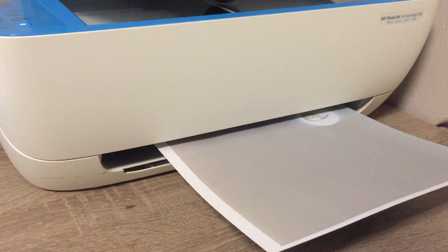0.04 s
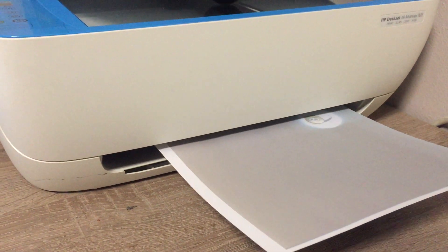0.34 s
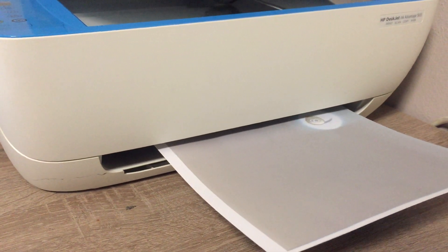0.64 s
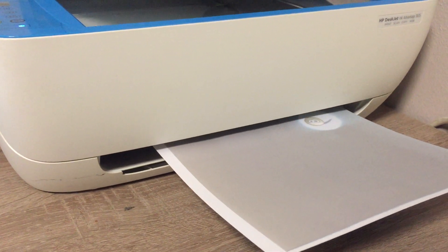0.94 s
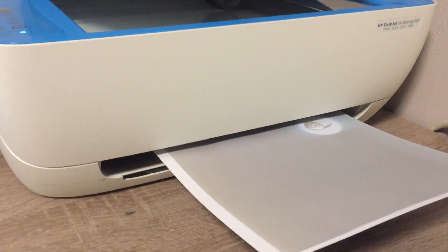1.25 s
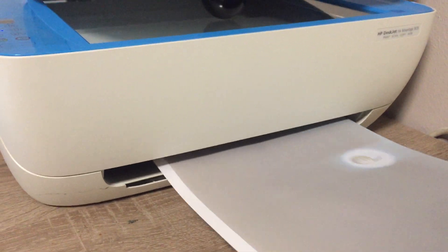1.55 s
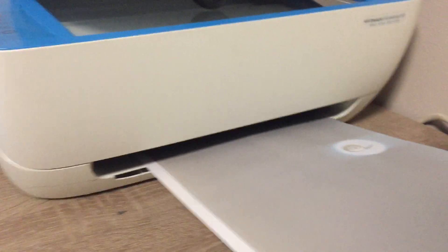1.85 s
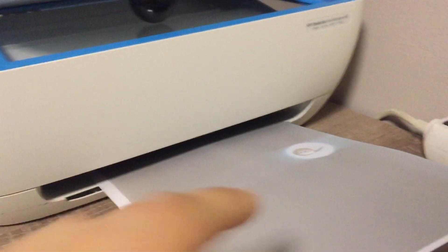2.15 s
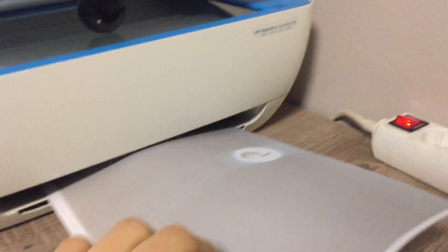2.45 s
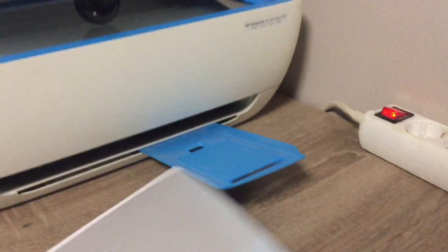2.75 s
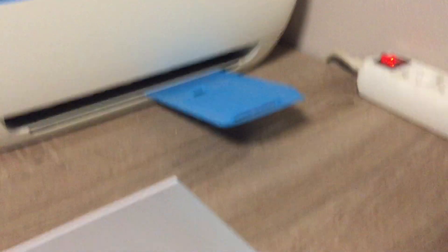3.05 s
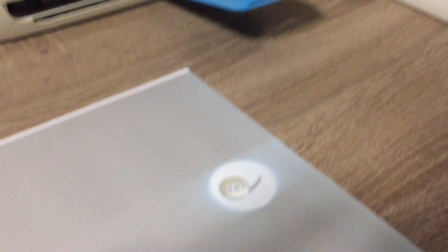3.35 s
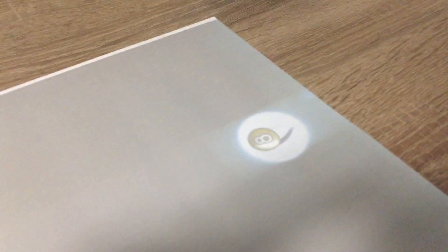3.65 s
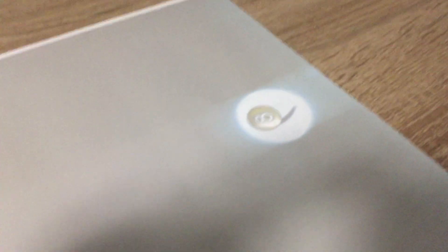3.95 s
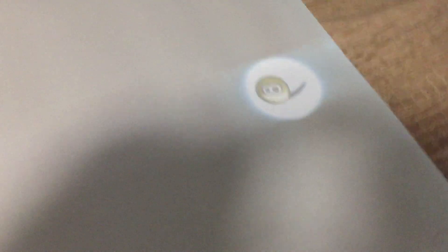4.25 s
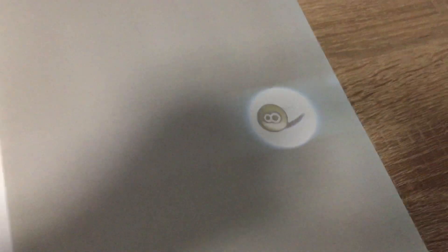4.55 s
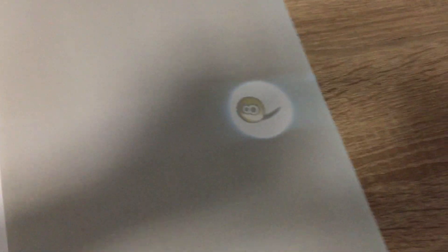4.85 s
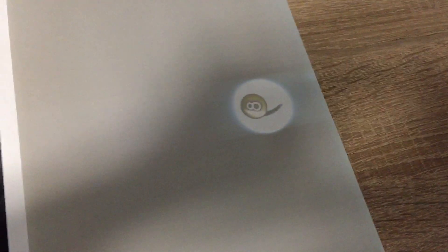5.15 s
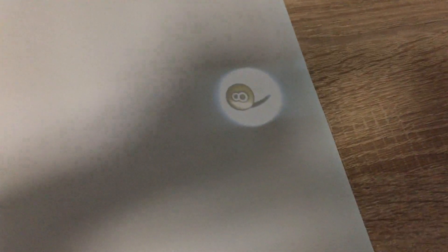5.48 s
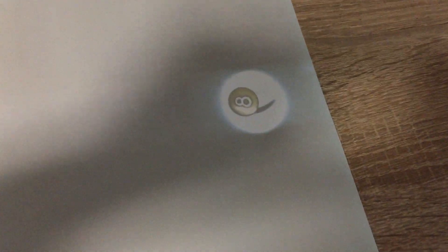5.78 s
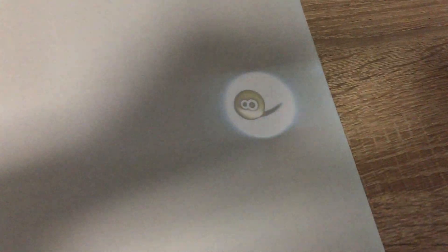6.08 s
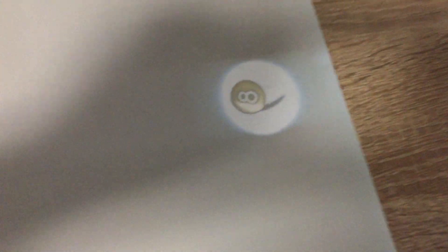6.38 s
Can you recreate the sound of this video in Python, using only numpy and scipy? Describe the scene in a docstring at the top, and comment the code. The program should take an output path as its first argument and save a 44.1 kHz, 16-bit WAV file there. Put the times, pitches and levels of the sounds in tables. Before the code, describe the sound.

Printer gears whir as the carriage shuttles and rattles home, then paper is pulled from the tray and flexes faintly over a steady hum.

```python
"""An inkjet printer on a wooden desk finishes a page over a steady mains hum. Its feed gears whir and
shake the case while the carriage makes four passes, whining up to speed and rattling to a stop.
At 1.5 s the carriage races home, belt teeth clattering, and the rollers drive the sheet out.
At 2.5 s the sheet snaps free and scrapes over the tray, ringing the air gap beneath it.
From 4.4 s it flexes a few times in the hand."""
import sys
import numpy as np
from scipy import signal
from scipy.fft import rfft, irfft
from scipy.io import wavfile

SR = 44100
rng = np.random.default_rng(int(sys.argv[2]) if len(sys.argv) > 2 else 0)


def output_pcm(signal):
    """Save a mono or channel-first signal as 16-bit PCM at the path in sys.argv[1].

    Samples are clipped to [-1, 1] before scaling.
    """
    pcm = np.clip(np.atleast_2d(signal).T, -1, 1) * 32767
    wavfile.write(sys.argv[1], SR, np.round(pcm).astype(np.int16))


N = 291942
T = np.arange(N) / SR

# Spectra of the sources. Each row: frequency in Hz, relative level in dB.
AIR_SPECTRUM = [(100, -46), (170, 2.5), (284, -4.5), (312, -6), (378, -15), (416, -3.5), (553, -17),
                (596, -11), (631, -16), (3300, -23), (3920, -23.5), (4830, -26), (12700, -32.5),
                (16000, -34)]
RUMBLE_SPECTRUM = [(20, -37), (40, -27), (62, 4.5), (90, 2.5), (170, 2), (230, -25)]
BEND_SPECTRUM = [(150, -8), (300, 1), (450, 10), (530, 2), (620, 6), (780, -1), (950, 4), (1200, -4.5),
                 (1450, -7.5), (1860, -12.5), (2500, -13.5), (3300, -19), (4000, -23), (5500, -22.5),
                 (9000, -33), (16000, -45)]
BUCKLE_SPECTRUM = [(150, -16), (250, 5), (332, 0), (400, 5), (490, 1), (592, 12), (760, -12.5), (925, 4.5),
                   (1200, -4), (1450, -5.5), (1860, -12), (2100, -8.5), (2400, -12.5), (3080, -11.5),
                   (5500, -22.5), (9000, -32.5), (16000, -42)]
TICK_SPECTRUM = [(1000, -23), (3300, -11), (3900, 5), (4500, -14), (9000, -25)]
KNOCK_SPECTRUM = [(200, -6), (560, 10.5), (900, -4), (1500, -9.5), (3400, -8), (4000, -21), (5400, -30.5),
                  (8000, -40)]
SNAP_SPECTRUM = [(240, -40), (400, -36), (600, -22), (900, -6), (1300, -0.5), (1960, -4), (2550, -6.5),
                 (2930, -9), (3420, -10.5), (5030, -26), (5520, -31), (8760, -44), (14800, -41),
                 (16000, -41)]
SLIDE_SPECTRUM = [(410, -30), (700, -15), (1150, -7), (2600, 1), (3400, 3.5), (3950, 6.5), (4600, 3.5),
                  (5700, 3), (6920, 4.5), (7590, -5.5), (8530, 1), (10500, -5.5), (15000, -5), (16000, -31)]
SWISH_SPECTRUM = [(4700, -17), (5500, 4.5), (5950, -5), (6550, 1), (7200, -12), (8200, -20)]
GEAR_SPECTRUM = [(220, -31), (380, -25), (407, -9.5), (447, -5), (576, -3.5), (662, 0.5), (710, 2.5),
                 (815, -5), (974, -4.5), (1280, -5), (1420, -24.5), (1590, -21), (2400, -14.5), (3120, -66),
                 (5280, -120)]
CHATTER_SPECTRUM = [(880, -21.5), (1500, 0.5), (2100, -3), (2250, -12.5), (2610, 1), (2740, -2.5),
                    (3000, -3), (4120, -9), (4830, -20.5), (5380, -17), (6630, -19.5), (7610, -26),
                    (10200, -24.5), (12500, -20), (16000, -33)]
CLACK_SPECTRUM = [(200, -8.5), (620, 2.5), (950, -1.5), (1300, -3), (1700, -0.5), (2050, 2.5), (2250, -4),
                  (2480, -3.5), (3000, -6), (3800, -8.5), (4400, -11), (4900, -10), (6500, -10.5),
                  (10000, -17.5), (16000, -21)]
BELT_SPECTRUM = [(140, -46), (230, -5), (485, -10), (511, -20), (569, -6), (902, -7.5), (969, -4.5),
                 (1380, -12), (1900, -8), (2270, -16.5), (2440, -17), (4790, -24), (6140, -25.5),
                 (14600, -38.5), (16000, -34)]
RAIL_SPECTRUM = [(3000, 0), (9000, -18), (10500, -16), (11500, -2), (12200, -9), (12900, -3), (13400, -12),
                 (13900, -13), (16000, -13)]

# Impacts. Each row: start in seconds, level in dB, rise and decay in seconds, tilt in dB per octave,
# then, where present, ring frequency in Hz and ring gain in dB.
DESK_BUMPS = [(1.996, -37, 0.0036, 0.022, 1), (3.59, -56, 0.015, 0.04, -22),
              (5.35, -55, 0.0098, 0.045, 0.5)]
SOFT_BENDS = [(4.481, -64.5, 0.0072, 0.06, 4, 3000, 0), (4.729, -66, 0.0034, 0.0091, -4, 850, 9),
              (4.834, -64, 0.013, 0.0082, 4.5, 780, 11), (4.94, -54.5, 0.017, 0.03, 1.5, 920, -8),
              (5.008, -52, 0.012, 0.018, 1, 770, 4), (5.122, -61, 0.019, 0.017, -3.5, 1300, 5),
              (6.54, -65.5, 0.0064, 0.024, 9, 2510, 3), (6.591, -60, 0.0043, 0.01, 4.5, 4120, 9)]
CRISP_BUCKLES = [(4.449, -40.5, 0.00051, 0.0047, -1.5, 2070, 12),
                 (4.4666, -46.5, 0.00063, 0.0019, 6, 3060, 9), (4.472, -38, 0.00054, 0.0026, -3.5, 2200, 2),
                 (4.475, -43, 0.00073, 0.0022, 6, 1110, -9), (4.479, -42, 0.0004, 0.003, -5, 593, -3),
                 (4.565, -51.5, 0.0026, 0.018, -1, 1440, 3), (4.586, -44, 0.0035, 0.0046, -0.5, 3370, 0),
                 (4.609, -52, 0.0025, 0.005, -1, 1030, -1), (5.16, -52, 0.001, 0.0057, -4, 1240, 6),
                 (6.472, -53.5, 0.00077, 0.0053, -3, 610, 14), (6.520, -55, 0.0011, 0.0037, -4.5, 580, 4),
                 (6.589, -53, 0.00096, 0.0028, 6, 1380, 21)]
CORNER_TICKS = [(5.767, -62, 0.00088, 0.0032, -1)]
ROLLER_KNOCKS = [(1.997, -32.5, 0.00186, 0.0037, -0.5), (2.379, -42.5, 0.0033, 0.0049, 1.5),
                 (2.413, -39.5, 0.0007, 0.0097, 1), (2.436, -50, 0.0017, 0.008, 3)]
EDGE_SNAPS = [(2.527, -26.5, 0.0011, 0.0028, 4, 3050, 5), (2.534, -28, 0.00087, 0.0049, -4.5, 1960, 6),
              (2.543, -42, 0.001, 0.0087, -5, 1300, 13), (2.707, -65, 0.0012, 0.0062, -1, 2070, -1),
              (2.862, -48, 0.005, 0.0062, 6, 1850, -2), (2.986, -48, 0.00088, 0.0083, 11, 2760, 27),
              (3.071, -43, 0.0016, 0.005, 1.5, 2340, 10), (3.076, -41, 0.0016, 0.0023, 14, 4500, 25)]
CARRIAGE_CLACKS = [(0.0275, -32.5, 0.0024, 0.0081, 0.5, 665, 13), (0.232, -52, 0.0014, 0.005, 7, 9200, 5),
                   (0.344, -36, 0.003, 0.0061, -4.5, 1910, 2), (0.355, -38.5, 0.003, 0.015, -3, 4300, 10),
                   (0.638, -44, 0.00093, 0.004, -1, 8500, 9), (0.642, -32, 0.0016, 0.0039, -1, 2500, 15),
                   (1.071, -36, 0.002, 0.0074, -5, 2340, 0), (1.082, -35, 0.0018, 0.0065, -3, 4240, 9),
                   (1.361, -43.5, 0.00065, 0.0067, 0, 8440, 5),
                   (1.365, -33.5, 0.0019, 0.0058, -1.5, 2070, 0),
                   (1.708, -38, 0.0021, 0.012, -6.5, 1440, 6)]

# Sheet dragged over the tray. Each row: start and length in seconds, level in dB, tilt in dB per octave.
TUGS = [(2.588, 0.075, -50.5, -7), (2.647, 0.09, -53.5, 0), (2.744, 0.041, -51.5, 4),
        (2.774, 0.12, -55.5, -1), (2.854, 0.036, -46, 7), (2.875, 0.081, -66.5, 2), (2.966, 0.085, -55, -1),
        (3.055, 0.049, -50.5, -1)]
# Lowest resonance of the air gap under the sheet. Each row: time in seconds, frequency in Hz.
GAP_PITCH = [(2.51, 1760), (2.57, 1350), (2.65, 1320), (2.72, 1620), (2.79, 1420), (2.89, 1780),
             (2.97, 2600), (3.03, 3440)]
# Air gap modes. Each row: offset above the lowest in Hz, width in Hz, relative level in dB.
GAP_MODES = [(0, 1740, 16), (2300, 510, -2)]
# Case on the desk. Each row: mode frequency in Hz, width in Hz, relative level in dB.
CASE_MODES = [(81.6, 23, -6), (109.5, 14, 2), (116.4, 16.2, 4.5), (158.3, 4.7, -13), (179, 30, -20),
              (213.6, 24.7, -2), (252, 22, -9.5), (322.6, 108, -2.5)]
# Feed motor effort. Each row: time in seconds, relative level in dB.
FEED_LOAD = [(0, 1), (1.4, 0.5), (1.9, 0), (2.43, -2), (2.48, -6.5), (2.6, -6.5), (2.7, -15.5), (2.8, -34)]
# Drive jerks. Each row: start and length in seconds, extra rattle and extra case shake in dB.
JERKS = [(0, 0.065, 3, 3), (0.118, 0.059, 6.5, 0), (0.398, 0.071, 2, 6), (1.993, 0.092, 2.5, -0.5),
         (2.39, 0.22, -3, 8.5)]
# Rollers advancing the sheet. Each row: start and length in seconds, swish level in dB.
PUSHES = [(0.382, 0.081, -67), (0.758, 0.053, -64), (1.17, 0.032, -71), (1.8, 0.045, -68),
          (1.845, 0.055, -67), (1.908, 0.06, -66.5), (2.05, 0.055, -71), (2.14, 0.092, -71),
          (2.282, 0.08, -69)]
# Roller squeals. Each row: start and length in seconds, first and last pitch in Hz, level in dB.
SQUEALS = [(2.248, 0.2, 2870, 3030, -64.5), (2.3, 0.094, 2370, 2430, -62), (2.353, 0.052, 7060, 7040, -75)]
# Gear mesh. Each row: frequency in Hz, relative levels in dB while printing and while ejecting.
MESH_TONES = [(174, -54, -52), (218.4, -56.5, -50.5), (352.4, -60, -61.5), (413.6, -60, -83),
              (566, -69, -58.5), (590, -59.5, -64), (708, -57.5, -49), (763, -60, -66), (888, -63.5, -58),
              (949, -71, -57), (1008, -60, -57.5), (1114, -62.5, -61), (1217, -74, -63), (1240, -78, -59.5),
              (1299, -70, -64), (1652, -70, -74), (2115, -72, -69), (2526, -72, -66), (2870, -82, -73),
              (3440, -78, -76)]
# Feed motor and rollers. Each row: frequency and width in Hz, relative printing and ejecting levels in dB.
FEED_WHINES = [(2567, 90, -66, -62.5), (3087, 80, -68, -71), (3480, 37, -74, -72), (4020, 23, -84, -73),
               (12080, 90, -97, -87), (12450, 120, -90, -91)]
# Belt and motor on the run home. Each row: frequency in Hz, relative level in dB.
HOME_TONES = [(479, -33), (959, -7.5), (1049, -19), (1120, -16), (1244, -21), (1498, -34), (1879, -19),
              (2392, -22.5)]
# Printing passes. Each row: end of run-up and length in seconds, direction (+1 out, -1 back), then levels
# in dB of whine, overtone, run-up growl, braking growl, rail hiss and rail whistle.
PASSES = [(0.16, 0.182, 1, -39, -50, -42, -41, -68, -86), (0.508, 0.19, -1, -46, -58, -57, -61, -67, -69.5),
          (0.876, 0.193, 1, -39.5, -51.5, -52, -42, -69, -85),
          (1.225, 0.19, -1, -48, -64, -61, -50, -68, -69.5)]

RUN_UP_S, RUN_DOWN_S = 0.042, 0.038  # belt motor
HOME_S, HOME_LENGTH_S = 1.462, 0.283
EJECT_S = 1.57  # from here the rollers let go and the drive runs ever more smoothly


def amp(db):
    """Decibels to gain."""
    return 10 ** (np.asarray(db) / 20)


def unit(x):
    """Scales to rms 1."""
    return x / np.sqrt(np.mean(x ** 2) + 1e-20)


def curve(rows):
    """Interpolates (time, value) rows over the scene."""
    return np.interp(T, *np.transpose(rows))


def gate(start_s, length_s, rise_s, fall_s):
    """Linear attack, hold and release, 0 to 1 and back."""
    return np.clip(np.minimum((T - start_s) / rise_s, (start_s + length_s - T) / fall_s), 0, 1)


def arch(start_s, length_s):
    """Half-sine swell, 0 to 1 and back."""
    return np.sin(np.pi * np.clip((T - start_s) / length_s, 0, 1))


def drift(rate_hz):
    """Slow random wander, rms 1."""
    hz = np.fft.rfftfreq(N, 1 / SR)
    return unit(irfft(rfft(rng.standard_normal(N)) / (1 + (hz / rate_hz) ** 4), N))


def grains(per_s, spread_db, count=N):
    """Random tiny impacts of uneven size, rms 1."""
    size = amp(spread_db * np.minimum(rng.exponential(1, count), 4))
    return unit(size * rng.choice([-1, 1], count) * (rng.random(count) < per_s / SR))


def tone(hz, waver, flutter_db=2):
    """A rotating part's tone, unsteady in speed and strength."""
    turns = np.cumsum(hz * (1 + waver * drift(26.4))) / SR + rng.random()
    return unit(np.sin(2 * np.pi * turns) * amp(flutter_db * drift(19)))


def resonate(x, hz, width_hz):
    """Steep resonance that follows hz, rms 1."""
    carrier = np.exp(2j * np.pi * np.cumsum(hz * np.ones(N)) / SR)
    pole = np.exp(-np.pi * width_hz / SR)
    return unit((carrier * signal.lfilter([1], np.poly([pole, pole]), x / carrier)).real)


def rasp(hz, noise_share, width_hz):
    """Motor tone with a share of its power smeared around its pitch."""
    smear = resonate(rng.standard_normal(N), hz, width_hz)
    return np.sqrt(1 - noise_share) * tone(hz, waver=.007) + np.sqrt(noise_share) * smear


def colour(x, spectrum, tilt_db_per_oct=0, ring_hz=0, ring_db=-99):
    """Minimum-phase filter with a tilt and an optional resonance; keeps the power of white noise."""
    size, ring_width_hz = 4096, 140
    hz = np.fft.rfftfreq(size, 1 / SR)
    octave = np.log2(hz / 1000 + .01)
    point_hz, point_db = np.transpose(spectrum)
    point_oct = np.log2(point_hz / 1000)
    outside_oct = np.maximum(point_oct[0] - octave, 0) + np.maximum(octave - point_oct[-1], 0)
    db = np.interp(octave, point_oct, point_db) + tilt_db_per_oct * octave - 24 * outside_oct
    ring = abs(1 + amp(ring_db) / (1 + 2j * (hz - ring_hz) / ring_width_hz))
    cepstrum = irfft(np.log(amp(np.maximum(db, -90)) * ring))
    taps = irfft(np.exp(rfft(2 * cepstrum[:size // 2], size)))
    return signal.oaconvolve(x, taps / np.linalg.norm(taps))[:len(x)]


def patchy(x, depth_db, width_hz, length_s):
    """As the contact point moves, different bands ring out for a moment."""
    size, hop = 512, 128
    bands = signal.stft(x, nperseg=size, noverlap=size - hop)[2]
    across = np.fft.fftfreq(len(bands), SR / size)[:, None]
    along = np.fft.rfftfreq(bands.shape[1], hop / SR)
    smooth = np.exp(-(2 * across * width_hz) ** 2 - (2 * along * length_s) ** 2)
    field = unit(np.fft.irfft2(np.fft.rfft2(rng.standard_normal(bands.shape)) * smooth, bands.shape))
    return signal.istft(bands * unit(amp(depth_db * field)), nperseg=size, noverlap=size - hop)[1][:N]


def blows(rows, spectrum, per_s, spread_db, crack_share=0):
    """Bursts of tiny impacts ring a body; a share of the energy is one crack at the peak."""
    out, t = np.zeros(N + SR), np.arange(SR // 4) / SR
    for start_s, db, rise_s, decay_s, *timbre in rows:
        shape = np.minimum(t / rise_s, 1) * np.exp(-np.maximum(t - rise_s, 0) / decay_s)
        burst = unit(shape * grains(per_s, spread_db, len(t)))
        crack = unit(signal.unit_impulse(len(t), np.argmax(shape)))
        force = np.sqrt(1 - crack_share) * burst + np.sqrt(crack_share) * crack
        gain = amp(db) * np.sqrt(np.mean(shape ** 2))
        out[round(start_s * SR):][:len(t)] += gain * unit(colour(force, spectrum, *timbre))
    return out[:N]


def scatter(x, wet_db, t60_s):
    """Adds short reflections from nearby walls."""
    t = np.arange(SR // 3) / SR
    taps = grains(per_s=2500, spread_db=1, count=len(t)) * amp(-60 * t / t60_s) * (t > .002)
    taps = colour(taps, [(250, 3.0), (5000, 0.5), (16000, -2.0)])
    return x + amp(wet_db) * signal.oaconvolve(x, taps / np.linalg.norm(taps))[:N]


def background():
    """Mains hum, slightly weaker at first, with faint room air and a low rumble."""
    hum_hz = 119.95
    hum_db = np.interp(T, [3.2, 4.2], [-45.5, -44]) + 0.66 * drift(2.2)
    hum = amp(hum_db) * unit(np.sin(2 * np.pi * (hum_hz * T + rng.random())))
    air = amp(-68) * unit(colour(rng.standard_normal(N), AIR_SPECTRUM))
    swell = amp(2.5 * drift(5))
    rumble = amp(-66.5) * unit(colour(rng.standard_normal(N), RUMBLE_SPECTRUM) * swell)
    return hum + air + rumble


def desk_bumps():
    """Soft bumps carried through the desk."""
    return blows(DESK_BUMPS, RUMBLE_SPECTRUM, per_s=4000, spread_db=1)


def paper_flex():
    """The held sheet bends and rubs on the fingers, buckles, and ticks at a corner."""
    bends = blows(SOFT_BENDS, BEND_SPECTRUM, per_s=3000, spread_db=1)
    buckles = blows(CRISP_BUCKLES, BUCKLE_SPECTRUM, per_s=6000, spread_db=0, crack_share=.35)
    ticks = blows(CORNER_TICKS, TICK_SPECTRUM, per_s=4000, spread_db=2, crack_share=.3)
    return bends + buckles + ticks


def paper_release():
    """The sheet knocks past the rollers; its edge snaps free and skips off the tray."""
    knocks = blows(ROLLER_KNOCKS, KNOCK_SPECTRUM, per_s=5500, spread_db=-1, crack_share=.16)
    return knocks + blows(EDGE_SNAPS, SNAP_SPECTRUM, per_s=12000, spread_db=.5)


def paper_slide():
    """Fibres catch on the tray with each tug; the air gap under the sheet rings higher as it shortens."""
    pull_s, rise_s, fall_s, gap_fade_db_per_s = 2.505, 0.0045, 0.029, 18.5
    fibres = grains(per_s=7000, spread_db=2.5) * amp(1.6 * drift(70))
    friction = amp(-67.5) * gate(pull_s, 0.675, rise_s, 0.043)  # light contact between tugs
    scrape = friction * unit(colour(fibres, SLIDE_SPECTRUM))
    for start_s, length_s, db, tilt_db_per_oct in TUGS:
        tug = amp(db) * gate(start_s, length_s, 0.024, fall_s)
        scrape += tug * unit(colour(fibres, SLIDE_SPECTRUM, tilt_db_per_oct))
        friction += tug
    gap_hz = curve(GAP_PITCH)
    gap = sum(amp(db) * resonate(fibres, gap_hz + offset_hz, width_hz)
              for offset_hz, width_hz, db in GAP_MODES)
    gap = unit(colour(gap, [(600, -12.0), (1000, -5.5), (16000, 1.5)]))  # a thin sheet radiates little bass
    gap *= amp(-47 - gap_fade_db_per_s * (T - pull_s)) * (friction / friction.max()) ** 0.24
    gap *= gate(pull_s, 0.565, rise_s, fall_s)  # until the sheet lifts off
    return patchy(scrape + gap, depth_db=2.5, width_hz=220, length_s=.016)


def roller_squeals():
    """Thin gliding squeals of rubber on the tail of the sheet."""
    out = np.zeros(N)
    for start_s, length_s, from_hz, to_hz, db in SQUEALS:
        hz = np.interp(T, [start_s, start_s + length_s], [from_hz, to_hz])
        out += amp(db) * arch(start_s, length_s) * tone(hz, waver=.003)
    return out


def case_shake():
    """The motors shake the hollow case in its low modes, harder at jerks and on the run home."""
    boom = 0
    for hz, width_hz, db in CASE_MODES:
        pole = np.exp((2j * np.pi * hz - np.pi * width_hz) / SR)
        ring = signal.lfilter([1], np.poly([pole, pole]), rng.standard_normal(N + SR))[SR:]
        boom += amp(db) * unit(ring.real / np.sqrt(abs(ring)))  # a steady drive evens out the swings
    boom = signal.sosfilt(signal.butter(4, 70, "high", fs=SR, output="sos"), boom)
    jerks_db = sum(db * arch(start_s, length_s) for start_s, length_s, _, db in JERKS)
    home_db = 3.5 * arch(HOME_S, HOME_LENGTH_S)
    ease_db = 5 * np.maximum(T - EJECT_S, 0)
    return unit(boom) * amp(-41.5 + curve(FEED_LOAD) + jerks_db + home_db - ease_db)


def pass_gate(start_s, length_s):
    """Belt motor run-up, cruise and run-down for one pass, 0 to 1 and back."""
    return gate(start_s - RUN_UP_S, RUN_UP_S + length_s + RUN_DOWN_S, RUN_UP_S, RUN_DOWN_S)


def feed_drive():
    """Plastic teeth rattle with the shaft and ring the case over mesh tones and whines; paper swishes."""
    shaft_hz, roller_hz, stop_s, stop_length_s, sag_per_s = 59.2, 15, 2.385, 0.13, 0.017
    ejected_s = np.maximum(T - EJECT_S, 0)
    ejecting = np.minimum(ejected_s / 0.026, 1)
    moving = sum(pass_gate(start_s, length_s) for start_s, length_s, *_ in PASSES)
    push_db = sum(arch(start_s, length_s) for start_s, length_s, _ in PUSHES)  # each push loads the gears
    jerks_db = sum(db * arch(start_s, length_s) for start_s, length_s, db, _ in JERKS)
    throb_db = 3.5 * tone(roller_hz, waver=.13, flutter_db=3.5)

    teeth = unit(grains(per_s=7000, spread_db=2) * (1 + .16 * tone(shaft_hz, waver=.01)))
    rattle = amp(-48 - 2 * ejected_s + push_db + jerks_db) * unit(colour(teeth, GEAR_SPECTRUM))
    ringing = patchy(scatter(teeth, wet_db=0, t60_s=.08), depth_db=1.6, width_hz=120, length_s=.03)
    chatter_db = -57 + 3.5 * (moving + ejecting) - 8.5 * ejected_s + push_db + 0.3 * throb_db
    chatter = amp(chatter_db) * unit(colour(ringing, CHATTER_SPECTRUM))

    speed = np.clip(1 - (T - stop_s) / stop_length_s, .3, 1) * (1 + .0012 * drift(12))
    mesh = sum(amp(db + (eject_db - db) * ejecting) * tone(hz * speed, waver=.0008, flutter_db=2.6)
               for hz, db, eject_db in MESH_TONES)
    slips = grains(per_s=1200, spread_db=2.5)
    sag = 1 - sag_per_s * ejecting * (T - 2.05)  # pitch falls as the sheet runs out
    whines = sum(amp(db + (eject_db - db) * ejecting) * resonate(slips, hz * sag, width_hz)
                 for hz, width_hz, db, eject_db in FEED_WHINES)

    rubbing = sum(amp(db) * arch(start_s, length_s) for start_s, length_s, db in PUSHES)
    rubbing += amp(-70.5 + throb_db) * moving
    friction = patchy(rng.standard_normal(N), depth_db=3, width_hz=200, length_s=.02)
    swish = rubbing * unit(colour(friction, SWISH_SPECTRUM))
    load = amp(curve(FEED_LOAD))  # mesh tones need loaded teeth, so they die first
    return swish + load * (rattle + chatter + load * mesh + whines * amp(throb_db - 5))


def carriage_clacks():
    """The shuttling carriage clacks and rattles; where a blow lands sets its ring."""
    return blows(CARRIAGE_CLACKS, CLACK_SPECTRUM, per_s=9000, spread_db=0, crack_share=.19)


def carriage_return():
    """The run home: belt teeth clatter in the case, the motor sings; braking dulls the clatter."""
    brake_s, brake_length_s = 1.657, 0.072
    motor, pulley = tone(hz=160, waver=.01), tone(hz=34, waver=.02)
    teeth = grains(per_s=6000, spread_db=2.5) * (1 + .08 * motor + .12 * pulley)
    bright = unit(colour(scatter(teeth, wet_db=-10, t60_s=.1), BELT_SPECTRUM))
    dull = unit(colour(bright, [(100, -3), (2000, 7.0), (3500, 0.0), (16000, -18)]))
    braking = np.clip((T - brake_s) / brake_length_s, 0, 1)
    clatter = (1 - braking) * bright + braking * amp(-0.5) * dull
    tones = sum(amp(db) * tone(hz, waver=.002, flutter_db=2.5) for hz, db in HOME_TONES)
    return (clatter + tones) * amp(-35) * gate(HOME_S, HOME_LENGTH_S, rise_s=.04, fall_s=.029)


def carriage_passes():
    """The belt motor growls up to speed, whines and growls down; the rail hisses and whistles."""
    cruise_hz, lag_hz, catch_up_s = 1020, 55.15, 0.018
    far_loss_db, near_loss_db, rail_lead_s = 13.5, 2.5, 0.011
    friction = patchy(rng.standard_normal(N), depth_db=2, width_hz=200, length_s=.02)
    hiss = unit(colour(friction, RAIL_SPECTRUM))
    whistle = resonate(rng.standard_normal(N), hz=12880, width_hz=140)
    hz, whine, overtone, run_up, run_down, rail = np.zeros((6, N))
    for start_s, length_s, direction, whine_db, overtone_db, up_db, down_db, hiss_db, whistle_db in PASSES:
        travelled = np.clip((T - start_s) / length_s, 0, 1)
        distance = travelled if direction > 0 else 1 - travelled
        running = pass_gate(start_s, length_s)
        hz += running * (cruise_hz - lag_hz * np.exp(-np.maximum(T - start_s, 0) / catch_up_s))
        cruising = running ** 4
        whine += amp(whine_db - far_loss_db * distance) * cruising
        overtone += amp(overtone_db - near_loss_db * (1 - distance)) * cruising
        run_up += amp(up_db) * arch(start_s - RUN_UP_S, RUN_UP_S)
        run_down += amp(down_db) * arch(start_s + length_s, RUN_DOWN_S)
        sliding = arch(start_s - rail_lead_s, length_s + RUN_DOWN_S)
        rail += (amp(hiss_db) * hiss + amp(whistle_db) * whistle) * sliding
    singing = whine * rasp(hz, 0.42, width_hz=240) + overtone * rasp(2 * hz, 0.7, width_hz=240)
    low, high = (rasp(k * hz, 0.93, width_hz=620) for k in (1, 2))  # nearly all rasp at full torque
    growl = run_up * (low + amp(-9) * high) + run_down * (high + amp(-3.5) * low)
    return singing + growl + rail


def scene():
    """Printer and paper in a small room, mono."""
    hits = carriage_clacks() + paper_release() + paper_flex()
    hits = patchy(hits, depth_db=2.2, width_hz=150, length_s=.04)
    hits = scatter(hits, wet_db=-8, t60_s=.15)
    printer = roller_squeals() + case_shake() + feed_drive() + carriage_return() + carriage_passes()
    return (background() + desk_bumps() + paper_slide() + hits + printer)[None]


def record(dry):
    """Steep low-pass at 15.85 kHz."""
    taps = signal.firwin(511, 15850, window=("kaiser", 9), fs=SR)
    return signal.oaconvolve(dry, taps[None], "same")


dry = scene()
out = record(dry)
output_pcm(out)
```